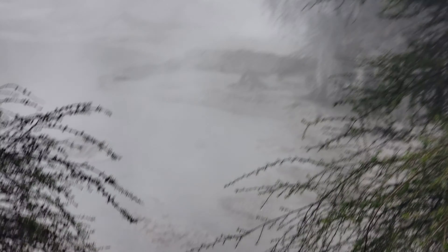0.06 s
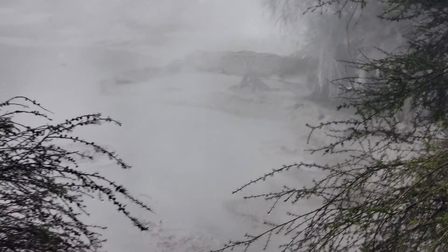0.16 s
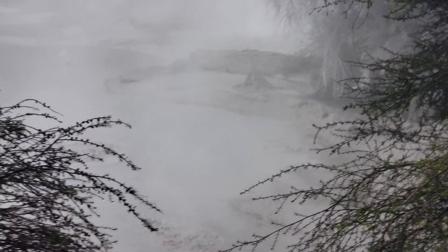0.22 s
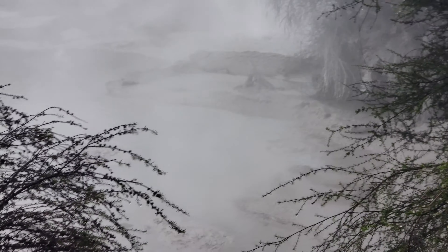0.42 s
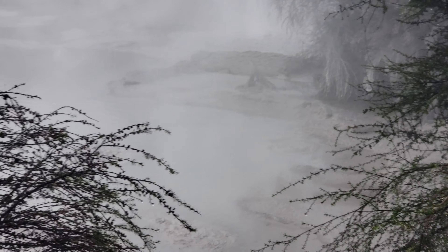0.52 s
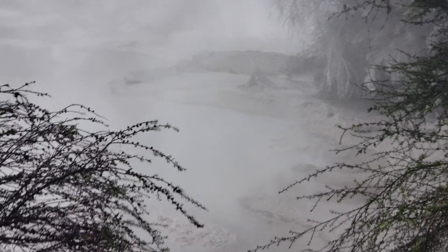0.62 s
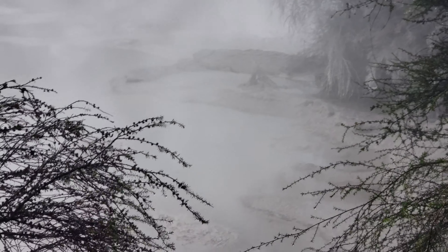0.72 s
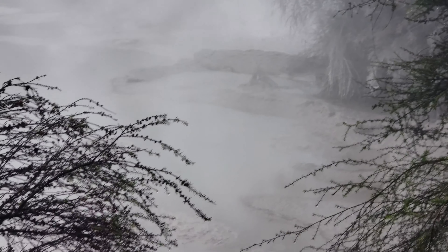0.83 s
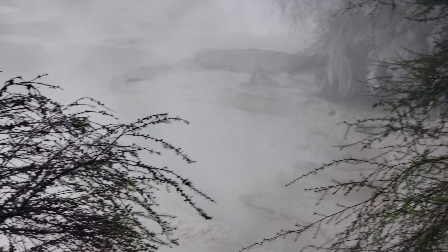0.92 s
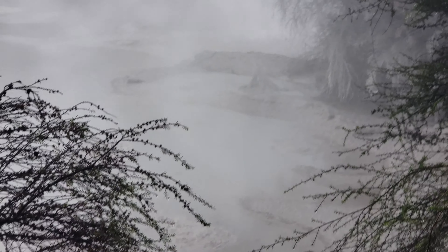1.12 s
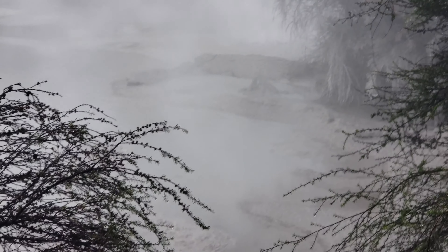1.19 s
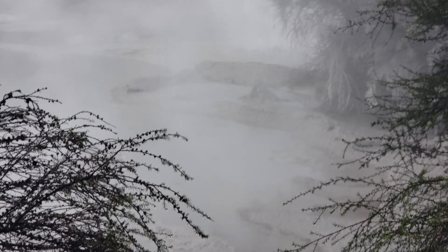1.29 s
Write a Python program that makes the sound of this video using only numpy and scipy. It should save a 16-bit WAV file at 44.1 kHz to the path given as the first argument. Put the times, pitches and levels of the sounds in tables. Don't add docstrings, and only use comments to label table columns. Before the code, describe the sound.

Thick mud bubbles and plops in a steaming outdoor pool, with one sharp handling knock early on

```python
import sys
import numpy as np
from scipy import signal
from scipy.io import wavfile

SR = 44100
rng = np.random.default_rng(int(sys.argv[2]) if len(sys.argv) > 2 else 0)


def materialize(psi):
    bounded = np.clip(np.atleast_2d(psi).T, -1, 1)
    quanta = np.round(bounded * 32767).astype(np.int16)
    wavfile.write(sys.argv[1], SR, quanta)


def natural_amplitude(level_db):
    exponent = np.asarray(level_db, float) / 20
    return 10 ** exponent


N = 59535


def rms_one(x):
    return x / np.sqrt(np.mean(x ** 2) + 1e-20)


def at_hz(points, hz):
    table = np.array(points)
    return np.interp(np.log(hz), np.log(table[:, 0]), table[:, 1])


def pan(db):
    return natural_amplitude(np.array([[db / 2], [-db / 2]]))


def drift(rate):
    r = np.exp(-80 * np.pi * rate / SR)
    noise = rng.standard_normal(N // 40 + 2002)
    slow = signal.lfilter([1], [1, -2 * r, r * r], noise)[2000:]
    return np.interp(np.arange(N) / 40, np.arange(len(slow)), rms_one(slow))


def ring(clicks, hz, t60):
    r, w = natural_amplitude(-60 / (t60 * SR)), 2 * np.pi * hz / SR
    return signal.lfilter([0, np.sin(w)], [1, -2 * r * np.cos(w), r * r], clicks + 1e-18)


def gate(since, until, edge_s):
    return np.clip(np.minimum(since, until) / edge_s + .5, 0, 1)


# (frequency [Hz], left-right likeness [0..1])
LIKENESS = [(25, .3), (70, 0.8), (180, 0.86), (550, 0.36), (1650, 0.04), (4970, 0.07), (15000, -0.01)]
# (frequency [Hz], L-R [dB])
LEAN = [(60, 4.5), (180, 4.5), (550, 5.0), (1650, 4.5), (4970, -1.0), (15000, 1.0)]


def banded_noise(spectrum, patchy_db, shape=lambda hz: 1):
    out, plain, together = 0, 0, drift(5.9)
    edges = 22 * 2 ** np.arange(0, 9.6, .5)
    white = rng.standard_normal((2, 2, N + 4000))
    for k, (low, high) in enumerate(zip(edges, edges[1:])):
        sos = signal.butter(2, [low, high], "band", fs=SR, output="sos")
        mid, side = signal.sosfilt(sos, white[k % 2])[:, -N:]
        hz = np.sqrt(low * high)
        alike = np.sqrt(np.clip(at_hz(LIKENESS, hz), 0, 1))
        flicker_db = patchy_db * (0.67 * together + drift(10.1))
        gain = natural_amplitude(at_hz(spectrum, hz) + flicker_db) * pan(at_hz(LEAN, hz))
        band = gain * (np.sqrt(1 + alike) * mid + np.sqrt(1 - alike) * side * [[1], [-1]])
        out, plain = out + band * shape(hz), plain + band
    return out / np.sqrt(np.mean(plain ** 2))


def grains(per_s, low_hz, high_hz, cycles, spread_db):
    sizes = natural_amplitude(spread_db * np.minimum(rng.exponential(1, N), 2.5)) * rng.choice([-1, 1], N)
    born = rng.random(N) < per_s / SR
    dealt = rng.integers(0, 16, N)
    out = 0
    for k, hz in enumerate(np.geomspace(low_hz, high_hz, 16)):
        out = out + ring(sizes * born * (dealt == k), hz, cycles / hz)
    return rms_one(out)


def pocket(s, db, hz, cycles, rise):
    life_s, fade_s = 0.051, 0.0044
    t = np.clip(np.arange(N) / SR - s, 0, .3)
    turns = np.cumsum(hz * 2 ** (rise * t) * (t > 0)) / SR
    swell = 1 - np.exp(-turns / 0.55)
    decay = natural_amplitude(db - 20 * turns / max(cycles, .5))
    return -decay * swell * np.sin(2 * np.pi * turns) * np.clip((life_s - t) / fade_s, 0, 1)


# (time [s], peak level [dB], pitch [Hz], ring [cycles], rise [octaves/s])
PLOPS = [(0.035, -48.5, 136, 4.7, -0.5), (0.125, -39, 98, 2.8, -0.5), (0.141, -44, 234.5, 5.4, 5),
         (0.251, -37.5, 83, 4, 2.5), (0.282, -41.5, 150, 3.7, 16), (0.312, -58, 165, 4, -4),
         (0.434, -51, 72.8, 4.5, 5.5), (.520, -48.5, 288, 8.9, 17), (.540, -50.5, 442, 22, 24),
         (0.553, -53, 113, 2.4, 7), (.606, -46, 150, 2.8, 48), (0.6128, -40.5, 246, 7.2, 3.5),
         (.633, -49.5, 193.5, 6.6, -20), (0.709, -53.5, 136.5, 14, -0.5), (0.7968, -30.5, 276, 1.34, -6),
         (.905, -46.5, 120.4, 5.4, 7), (0.934, -53.5, 187.4, 18.4, 31), (1.034, -47.5, 159, 2.2, 2.5),
         (1.074, -38.5, 211, 3.3, 22), (1.084, -48, 107, 5, -17), (1.135, -56, 207, 9.9, 28),
         (1.165, -33.5, 257, 1.7, 15.5), (1.186, -42, 695, 4.9, 20), (1.198, -30.5, 378, 1.44, -13),
         (1.205, -55, 113, 2.3, 0)]


def plops():
    return sum(pocket(*plop) for plop in PLOPS)


# (time of peak [s], peak level [dB], pitch [Hz])
BLIPS = [(.008, -47, 525), (.047, -50, 730), (.074, -48.5, 920), (0.079, -48, 316), (0.096, -49, 249),
         (.113, -45.5, 338), (.172, -45.5, 88), (.189, -43, 357), (0.214, -44.5, 132), (.203, -43, 508),
         (0.225, -47, 800), (0.23, -39, 442), (0.274, -39, 202), (0.31, -46.5, 280), (.327, -42.5, 630),
         (0.353, -58, 89), (.360, -62, 457), (0.379, -60, 228), (.396, -58, 570), (0.397, -57, 283),
         (.425, -57, 630), (.457, -50, 520), (0.464, -52, 257), (0.479, -64, 105), (.500, -66, 129),
         (0.535, -52, 231), (.641, -47, 840), (.669, -48.5, 617), (.675, -49, 109), (.730, -55, 81),
         (0.751, -50, 224), (0.807, -43.5, 109), (.889, -48, 490), (0.943, -54, 45), (0.986, -54.5, 49.4),
         (1.010, -57, 715), (1.036, -52, 640), (1.088, -47.5, 710), (1.114, -48, 287), (1.150, -52.5, 567),
         (1.169, -47, 113), (1.182, -43, 200), (1.213, -52, 63.4), (1.262, -54, 44.6), (1.312, -50, 281)]


def blips():
    return sum(pocket(s - 0.96 / hz, db, hz, 3.34, 1.4) for s, db, hz in BLIPS)


# (time [s], level [dB])
BOIL = [(0, -63), (.17, -62), (0.378, -60), (.43, -65.5), (.5, -64), (.6, -65.5), (0.698, -60.5),
        (.77, -69.5), (0.86, -64), (1.0, -68.5), (1.12, -65.5), (1.35, -66.5)]


def boil_level():
    boil_db = np.interp(np.arange(N) / SR, *np.transpose(BOIL))
    return boil_db, natural_amplitude(boil_db - boil_db.mean())


def pool(vigour):
    echo_s, echo_db = 0.00636, -24.5
    gurgle = natural_amplitude(-66) * grains(240 * vigour, 144, 804, 4.7, 2.5)
    direct = plops() + blips() + gurgle
    echo = natural_amplitude(echo_db) * np.roll(direct, int(echo_s * SR)) * [[1], [-1]]
    return direct + echo


# (time [s], peak level [dB], pitch [Hz], L-R [dB])
DROPS = [(0.061, -55, 2040, 23), (0.151, -38, 1230, 10), (.18, -44.5, 705, 17.5), (.205, -41.5, 2430, 6),
         (.213, -39.5, 3060, -3), (0.314, -41.5, 755, 7), (0.326, -46.5, 2630, -3), (.370, -41, 1300, 10),
         (.379, -51, 3950, 7), (.482, -43.5, 13200, -16.5), (.481, -39.5, 4700, -4),
         (0.489, -48.5, 1830, 3), (0.537, -44, 3900, 3), (0.566, -41, 1030, 10), (.613, -51.5, 4450, 0),
         (.66, -45, 3150, 4), (0.669, -47.5, 1460, 18), (0.131, -56, 1440, 6), (0.223, -50, 1440, 15),
         (.293, -48, 2850, 13), (.293, -49, 4900, -6), (.357, -48.5, 1300, 15), (0.393, -58.5, 1780, 8),
         (.698, -49, 4240, 11), (0.799, -49, 2250, 5), (.797, -51.5, 5260, 13), (.797, -54, 6750, 7),
         (0.861, -50, 3200, -1), (.88, -50, 7100, 5), (1.010, -52.5, 2630, 8.5), (1.035, -55.5, 2310, 19),
         (1.11, -51, 2900, -6), (1.336, -54.5, 4000, -14), (0.8028, -50, 1620, 14),
         (0.8025, -43, 4090, -17.5), (.8352, -48, 1330, 11), (0.845, -54, 4420, -6),
         (.8563, -41, 1120, 10.5), (0.8593, -46, 2530, 6), (.88, -46.5, 3480, 5), (0.881, -55, 11300, 12),
         (0.902, -50.5, 5200, 14.5), (1.032, -52, 1250, 11), (1.113, -47.5, 1240, 4),
         (1.251, -52, 4180, -10)]


def drops():
    ring_cycles, onset_cycles = 7, 0.4
    spray_db, spray_t60_s, spray_octaves = -11, 0.015, .45
    out, noise = np.zeros((2, N + SR)), rng.standard_normal((len(DROPS), 2, 2000))
    t = np.arange(2000) / SR
    puff_decay = natural_amplitude(spray_db - 60 * t / spray_t60_s)
    for (s, db, hz, pan_db), puff in zip(DROPS, noise):
        band = np.clip(hz * 2 ** (spray_octaves * np.array([-1, 1])), 200, 17000)
        sos = signal.butter(3, band, "band", fs=SR, output="sos")
        spray = rms_one(signal.sosfilt(sos, puff)) * puff_decay
        tone = ring(1. * (t == 0), hz, ring_cycles / hz + 0.0017)
        onset = 1 - np.exp(-t * hz / onset_cycles)
        i = int(s * SR)
        out[:, i:i + 2000] += natural_amplitude(db) * pan(pan_db) * onset * (tone + spray)
    return out[:, :N]


# (start [s], length [s], level [dB])
SHOWERS = [
    (.0, 0.014, -57),
    (0.129, 0.036, -58.5),
    (0.485, 0.02, -58.5),
    (0.64, 0.11, -76),
    (0.882, 0.031, -65),
    (1.055, 0.09, -64),
]
# (frequency [Hz], level [dB per Hz])
SHOWER = [(2000, -6.5), (4000, -16), (5700, 14), (9000, -35), (12000, -3), (16000, -15)]


def showers():
    t, swell = np.arange(N) / SR, 0
    for s, length, db in SHOWERS:
        swell = swell + natural_amplitude(db) * gate(t - s, (s + length - t) / 2, 0.03)
    return swell * banded_noise([(500, -50)] + SHOWER, 2.5)


# (time [s], left level [dB], right level [dB], contact sharpness [Hz])
KNOCK = [
    (.24665, -4.5, 2.5, 8370),
    (.24710, -1.5, -18.5, 6530),
    (0.2481, -22, -4, 6000),
    (0.2492, -18.5, -5.5, 2540),
    (.2496, -14.5, -19, 2000),
    (0.2506, -54, -6.5, 2300),
    (0.2554, -29, -27, 3000),
    (0.2604, -27, -26, 3500),
    (0.27, -33, -30, 5000),
    (.2755, -29, -31, 3000),
]


def blows(t):
    lag_s, through_db, through_lead_s = .00034, -4.5, 0.00014
    blow = 0
    for s, left_db, right_db, hz in KNOCK:
        late = t - s - np.array([[0], [lag_s]])
        blow = blow - natural_amplitude(np.array([[left_db], [right_db]])) * np.exp(-(late * hz * np.pi) ** 2) * hz / SR
    blow[1] -= natural_amplitude(through_db) * np.interp(t + through_lead_s, t, blow[1])
    blow = signal.sosfilt(signal.butter(2, 953, "high", fs=SR, output="sos"), blow)
    blow[1] = signal.sosfilt(signal.butter(1, 790, "high", fs=SR, output="sos"), blow[1])
    return blow


# (frequency [Hz], level [dB], t60 [s], L-R [dB])
HOUSING = [(150, -4, 0.052, 1), (360, -16.5, 0.037, -12), (647, -21.5, 0.029, 11.5), (1050, -34, 0.011, -9),
           (1356, -22.5, 0.018, 12), (1926, -13, 0.0062, -2), (2780, -20, 0.0098, 3.5),
           (3297, -20, 0.0078, -6.5), (4305, -21, 0.0098, -4), (4700, -14.5, 0.0033, -3.5),
           (6000, -24, 0.0087, 13.5), (6800, -19, 0.0079, -7), (7640, -14, 0.0026, -21.5),
           (11640, -20, 0.0074, 6)]


def housing(blow):
    peak, near_port_gain = .99, 1.4
    body = natural_amplitude(6.5) * blow
    for hz, db, t60, pan_db in HOUSING:
        body = body + natural_amplitude(db) * pan(pan_db) * ring(blow, hz, t60)
    return peak * body * [[near_port_gain], [1]] / np.abs(body).max()


# (frequency [Hz], level [dB per Hz])
RATTLE = [(120, -21), (200, 1), (1040, 7.5), (1810, -1.5), (3020, 0.5), (5520, -15.5), (9000, -26),
          (16000, -22)]
# (frequency [Hz], t60 [s])
RATTLE_T60 = [(200, 0.26), (1000, 0.078), (4000, 0.14), (14000, 0.37)]


def rattle(since):
    def dying(hz):
        return (since > 0) * natural_amplitude(-60 * np.maximum(since, 0) / at_hz(RATTLE_T60, hz))

    return natural_amplitude(-33.5) * pan(1.5) * banded_noise(RATTLE, 4.2, dying)


def knock():
    t = np.arange(N) / SR
    return housing(blows(t)) + rattle(t - KNOCK[0][0])


# (start [s], length [s], level [dB])
WHISTLES = [
    (1.156, 0.083, -69.5),
    (1.275, 0.066, -72.5),
]


def whistle():
    hz, t60 = 1377, 0.0083
    t, flow = np.arange(N) / SR, 0
    for s, length, db in WHISTLES:
        flow = flow + natural_amplitude(db) * gate(t - s, s + length - t, .012)
    return flow * rms_one(ring(ring(rng.standard_normal(N), hz, t60), hz, t60))


# (frequency [Hz], level [dB per Hz])
STEAM = [(290, -31), (500, 2.5), (740, -11), (1060, -20), (1360, -7), (2070, -5.5), (5800, -6),
         (9630, -28.5), (16000, -17.5)]


def steam(boil_db, vigour):
    fizz = np.array([grains(350 * vigour, 690, 6000, 3.6, 6.0) for _ in range(2)])
    hiss = banded_noise([(150, 1)] + STEAM, 2.32)
    return natural_amplitude(boil_db + 1.0) * (hiss + natural_amplitude(-5) * fizz)


# (frequency [Hz], level [dB per Hz])
CHURN = [(15, -39), (25, -7), (97, 0), (238, 0), (345, -6.5), (426, -2), (525, -9.5), (1200, -11.5),
         (1560, -59), (2640, -120)]


def churn(vigour):
    return natural_amplitude(-61.5) * vigour ** 0.5 * banded_noise(CHURN + [(3000, -56)], 3.34)


def scene():
    boil_db, vigour = boil_level()
    mud = pool(vigour)
    background = steam(boil_db, vigour) + churn(vigour)
    left_sources = (mud + whistle()) * pan(6.5)
    return left_sources + drops() + showers() + knock() + background


def top_cut(x):
    return signal.sosfilt(signal.butter(12, 16500, fs=SR, output="sos"), x)


def record(dry):
    low_pass = signal.cheby2(12, 70, 16900, fs=SR, output="sos")
    mix = signal.sosfilt(low_pass, dry)
    return top_cut(mix)


dry = scene()
out = record(dry)
materialize(out)
```